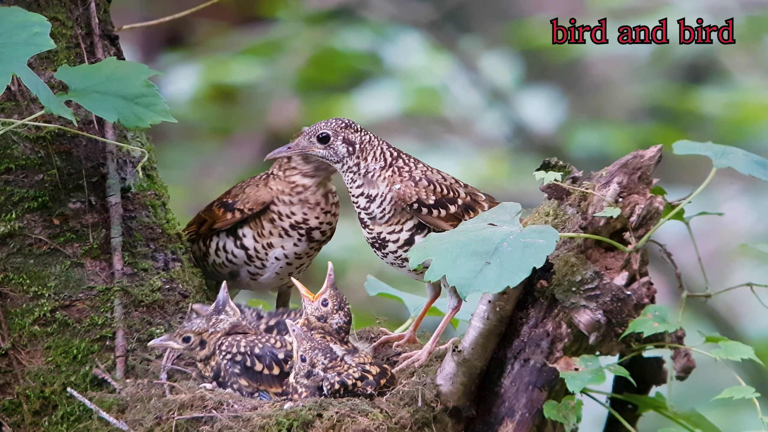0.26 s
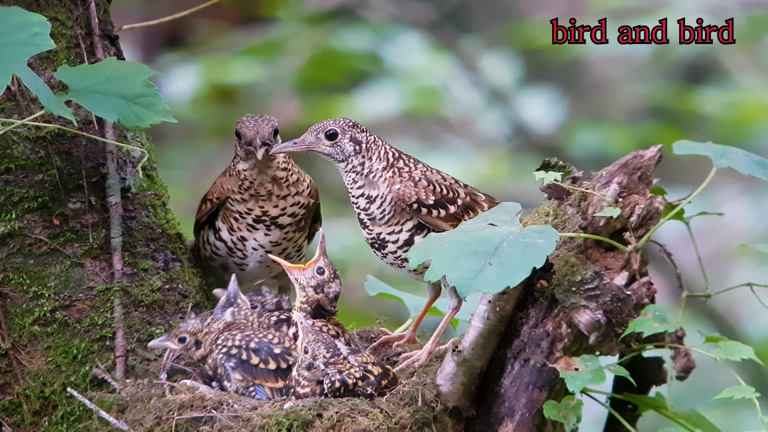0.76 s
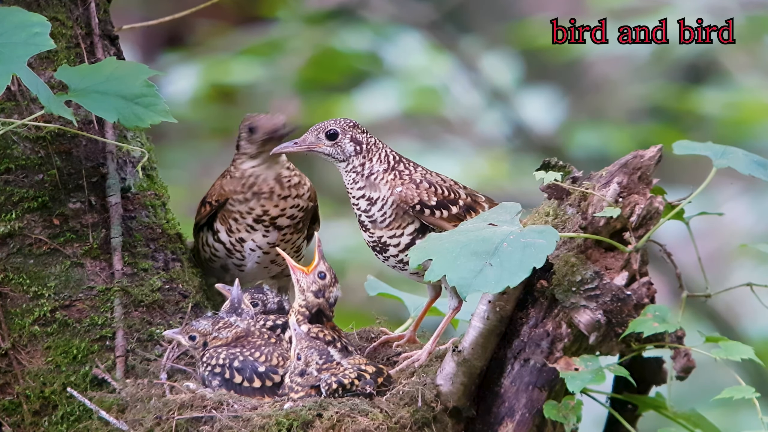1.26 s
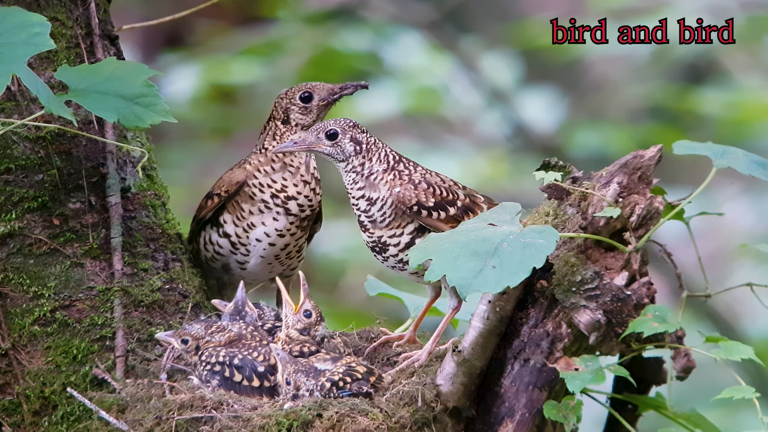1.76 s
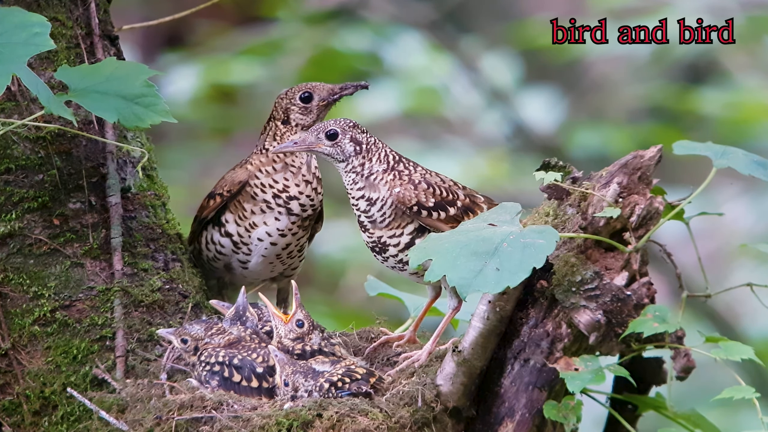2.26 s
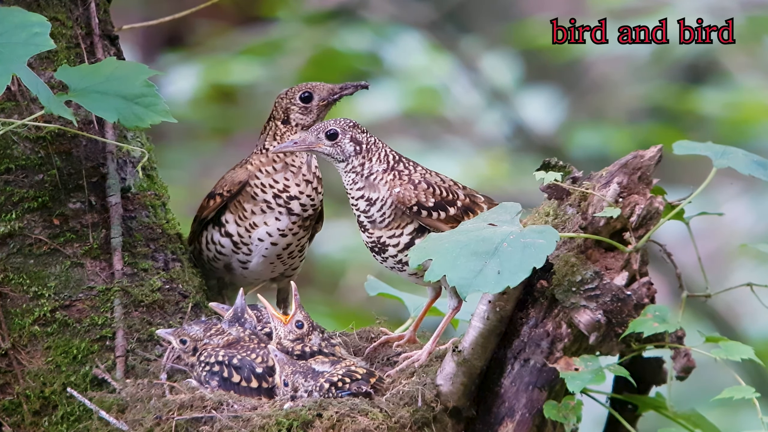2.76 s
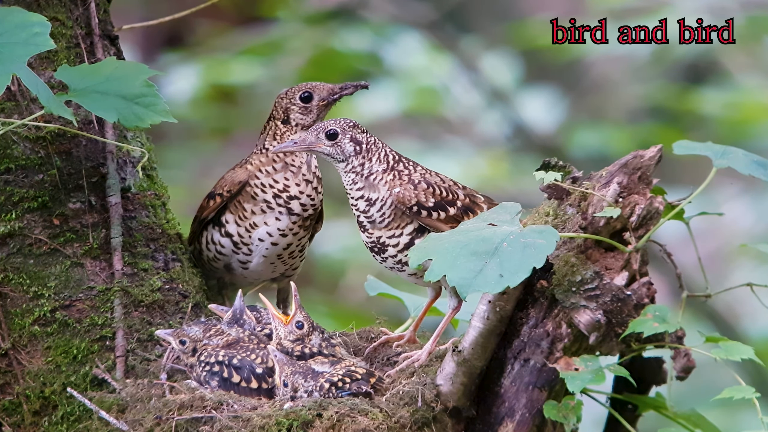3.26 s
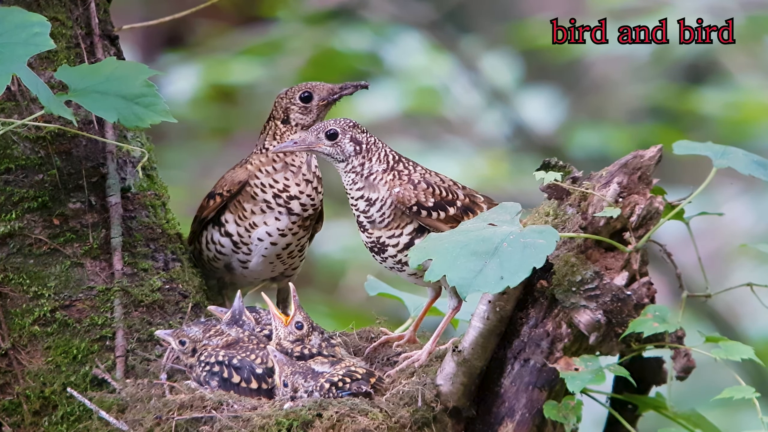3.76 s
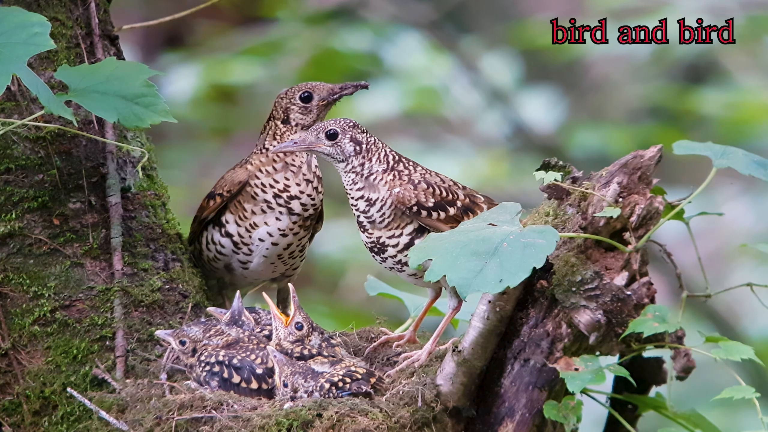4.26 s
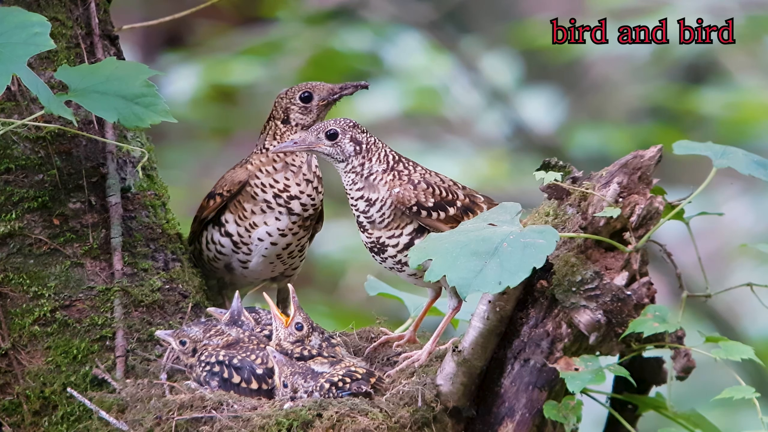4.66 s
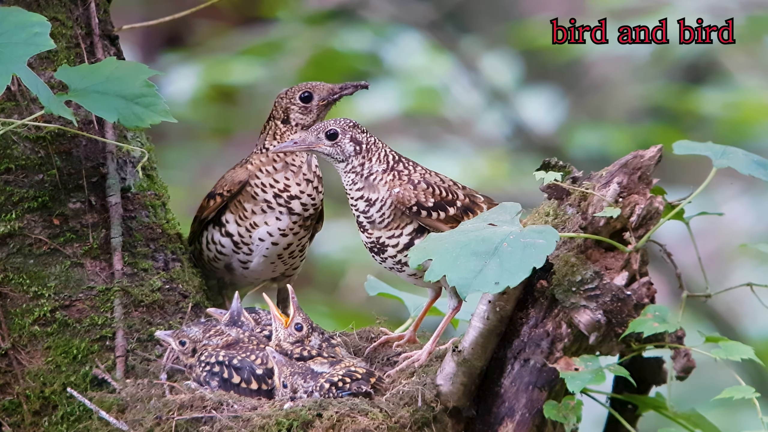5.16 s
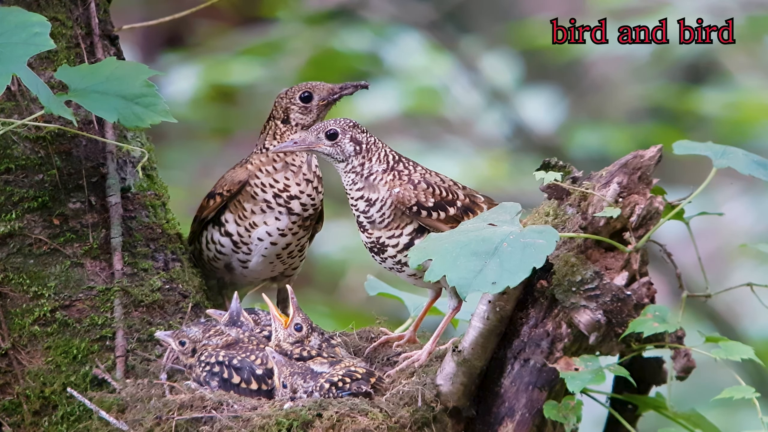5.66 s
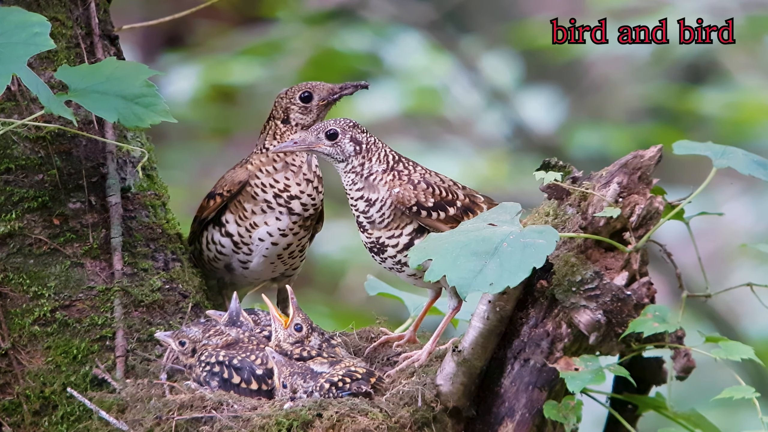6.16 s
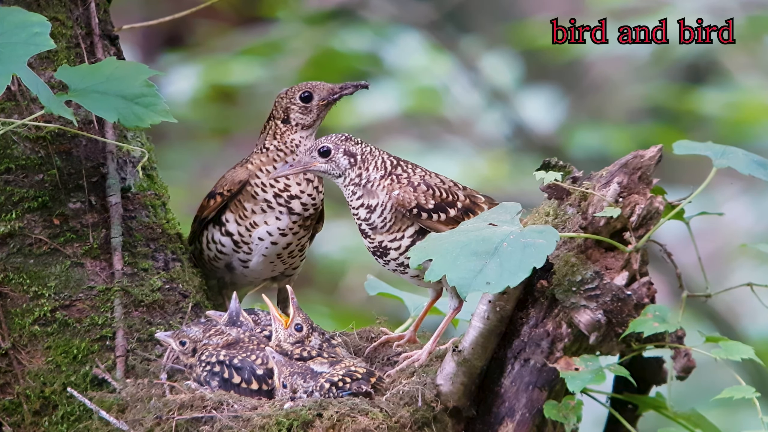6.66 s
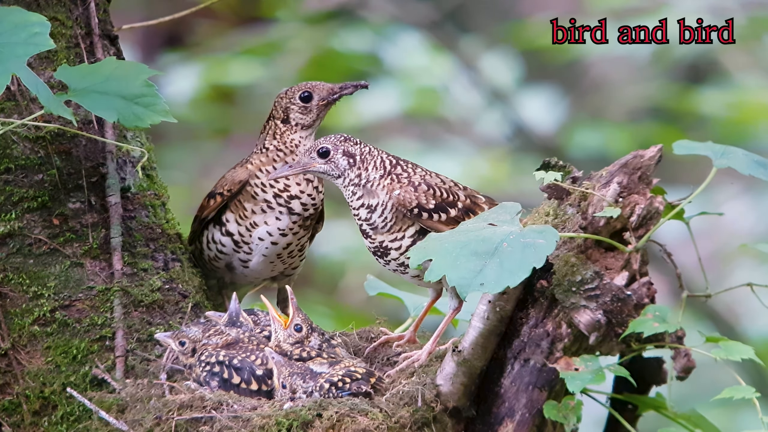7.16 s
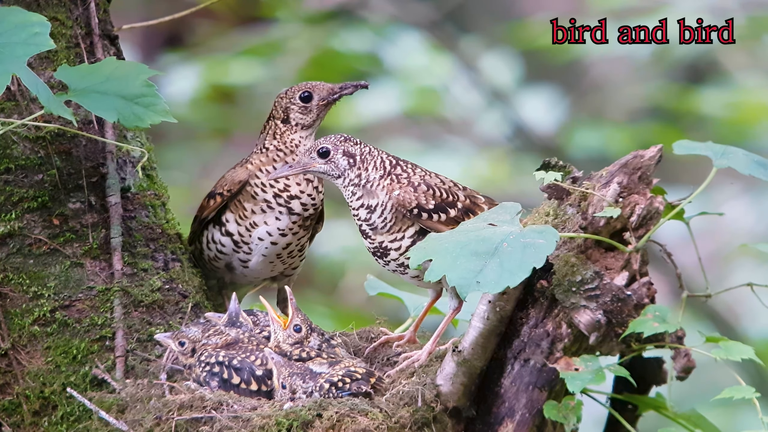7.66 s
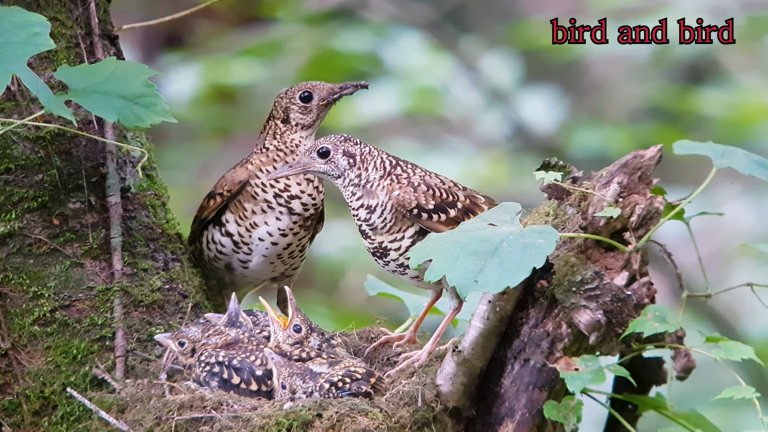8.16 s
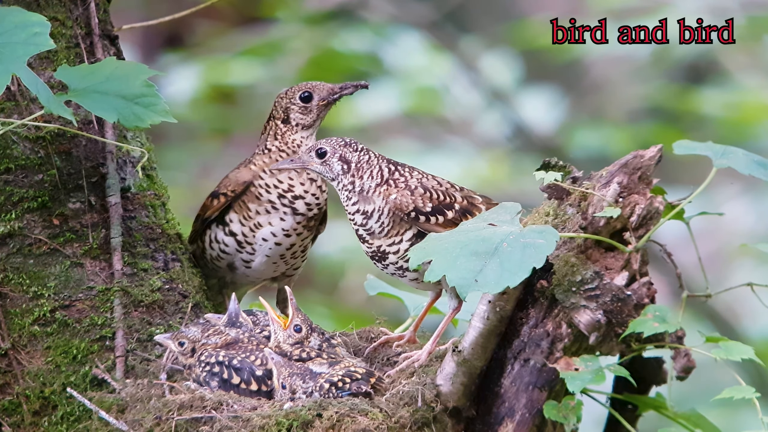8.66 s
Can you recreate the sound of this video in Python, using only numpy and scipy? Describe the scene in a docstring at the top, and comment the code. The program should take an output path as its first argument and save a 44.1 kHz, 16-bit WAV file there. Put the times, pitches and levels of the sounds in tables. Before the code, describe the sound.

Quiet woodland ambience heard from one spot in wide stereo: soft leaf hiss, a blurred insect chorus and a fast, faint cricket pulse to the right. Small birds farther off chatter almost continuously with quick slides and buzzy notes. Cicada noise rises and falls mostly on the right. Twice a clear, level thrush whistle stands out, fluttering slightly, then fading among the trunks.

```python
"""A summer forest from one spot: leaves hiss, a cricket throbs and a far insect chorus hangs throughout.
Songbirds farther off start at once: sines glide into chirrups, upslurs and flutes or blur into buzzes.
From under a second on, a cicada, mostly to the right, swells over its drone: noise pulses ring its body.
A thrush, a pure sine, gives a long, thin whistle at about 1.4 s and another at about 6.4 s.
The trunks return thrush and songbirds as decaying noise echoes; the insects and leaves stay dry."""
import sys
import numpy as np
from scipy import signal
from scipy.io import wavfile
from scipy.ndimage import uniform_filter1d

SR = 44100
rng = np.random.default_rng(int(sys.argv[2]) if len(sys.argv) > 2 else 0)


def unload_wav(signal):
    """Save mono or channel-first audio to the path in sys.argv[1] as 16-bit WAV at rate SR, clipped to [-1, 1]."""
    wavfile.write(
        sys.argv[1],
        SR,
        np.round(np.clip(np.atleast_2d(signal).T, -1, 1) * 32767).astype(np.int16),
    )


N = 392490

DRONE_LIFT_DB = -7.5  # lift of the cicada's upper mode while it only drones


def gain_of(db):
    """Decibels to an amplitude factor."""
    return 10 ** (np.asarray(db) / 20)


def evened(x):
    """Scales to unit rms."""
    return x / np.sqrt(np.mean(x ** 2) + 1e-20)


def curves(rows, t):
    """Every column after the first, read at the times t along straight lines."""
    s, *columns = np.transpose(rows)
    return [np.interp(t, s, column) for column in columns]


def sides(pan_db):
    """Left and right gains, pan_db apart (left minus right), that keep the mean power."""
    left_power = 1 / (1 + gain_of(-np.asarray(pan_db)) ** 2)
    return np.sqrt(2 * np.array([left_power, 1 - left_power])).reshape(2, -1)


def add(mix, s, sound):
    """Mixes a sound in from second s."""
    part = mix[:, round(s * SR):][:, :sound.shape[1]]
    part += sound[:, :part.shape[1]]


def resonate(x, hz, width):
    """A steep moving resonance: shifts the curve hz to zero, smooths twice, and shifts back."""
    turn = np.exp(2j * np.pi * np.cumsum(hz * np.ones(N)) / SR)
    r = np.exp(-np.pi * width / SR)  # width in Hz of each smoothing pass
    smooth = signal.lfilter([(1 - r) ** 2], [1, -2 * r, r * r], x / turn)
    return 2 * (turn * smooth).real


def wander(hz):
    """Random drift of unit rms: noise with what is faster than hz smoothed away."""
    return evened(signal.lfilter(*signal.butter(2, hz, fs=SR), rng.standard_normal(N)))


def echoes(x, t60, gap, sway, sway_hz):
    """Scatter from trunks, a decaying noise for each ear; swaying leaves make it flicker and blur."""
    t = np.arange(2 * SR) / SR
    # silent for gap seconds; falls 60 dB in t60 seconds
    tail = rng.standard_normal((2, len(t))) * gain_of(-60 * t / t60) * (t > gap)
    tail = tail / np.linalg.norm(tail[0])
    flicker = np.array([np.sqrt(1 - sway ** 2) + sway * wander(sway_hz) for ear in range(2)])
    return flicker * signal.fftconvolve(x, tail, axes=1)[:, :N]


def thrush():
    """A pure sine that holds its pitch; each ear's level dips as near reflections beat with it."""
    # The two whistles, one table each. Each row: time in seconds, pitch in Hz, level in dB before the dips,
    # left minus right in dB.
    whistles = [
        [(1.43, 2380, -71, -2), (1.5, 2330, -61, -1), (1.535, 2307, -60, -1), (1.61, 2334, -42, 4),
         (1.68, 2343, -37.5, 8), (1.72, 2352, -42, -7.5), (1.78, 2355, -33.5, 4.5), (1.84, 2348, -34.5, -1),
         (1.89, 2334, -36.5, 8), (2.075, 2348, -42.5, 7), (2.105, 2320, -60, 8)],
        [(6.44, 2470, -75, -2), (6.501, 2392, -51, 1), (6.55, 2376, -48.5, -2.5), (6.69, 2376, -41, -1),
         (6.735, 2400, -35.5, 1.5), (6.9, 2403, -37, -1.5), (6.96, 2413, -40.5, 6.5), (7.04, 2403, -42, 0),
         (7.07, 2388, -51, -3), (7.09, 2440, -73, 0)],
    ]
    # Brief dips of level. Each row: middle in seconds, half-width in seconds,
    # depth in the left ear and in the right ear in dB, before a short smoothing.
    dips = [(1.645, .014, -3.5, -9), (1.697, 0.0081, -15, -4), (1.803, .012, -3.5, -2),
            (1.864, 0.01, -19, -6), (1.933, 0.013, -9, -10), (1.99, 0.014, -1.5, -13),
            (2.045, 0.0069, -2.5, -2), (6.716, .008, -7, -4), (6.755, .007, -6, -1),
            (6.797, .009, -4.5, -1.5), (6.828, .008, -2.5, 0), (6.868, 0.0087, -3, -1.5),
            (7.006, .012, -2.5, -4.5)]
    # How strongly the trunks return the first and the second whistle, in dB.
    trunk_echo_db = (-16.5, -22)
    out, sent = np.zeros((2, 2, N))
    for rows, echo_db in zip(whistles, trunk_echo_db):
        t = np.arange(rows[0][0], rows[-1][0], 1 / SR)
        hz, db, pan_db = curves(rows, t)
        for s, half_width, *dip_db in dips:
            dip_shape = np.exp(-.5 * ((t - s) / half_width) ** 2)
            db = db + np.outer(np.minimum(dip_db, 0), dip_shape)
        level = uniform_filter1d(gain_of(db) * sides(pan_db), 300)
        tone = level * np.sqrt(2) * np.sin(2 * np.pi * np.cumsum(hz) / SR)
        add(out, t[0], tone)
        add(sent, t[0], gain_of(echo_db) * tone)
    return out + echoes(sent, t60=2.3, gap=.03, sway=.3, sway_hz=12)


def songbirds():
    """Gliding sines with a quick start; buzz trades the clean tone for a rasp around it."""
    buzz_hz, fade_hz = 430, 40  # half-width of the rasp; speed of the fading through leaves
    out = np.zeros((2, N))
    rasp, fading = (np.array([wander(hz) + 1j * wander(hz) for ear in range(2)])
                    for hz in (buzz_hz, fade_hz))
    for s, length, *hz, buzz, level_db, pan_db in notes():
        u = np.linspace(0, 1, round(length * SR))  # place within the note
        glide = np.interp(u, [0, .5, 1], hz)
        glide = uniform_filter1d(glide, len(u) // 4 + 1, mode="nearest")
        at = np.arange(len(u)) + min(round(s * SR), N - len(u))
        clean = (1 - .6 * np.clip(buzz, 0, 1)) * (1 + .5 * fading[:, at])
        voice = clean + (.1 + .7 * buzz) * rasp[:, at]
        shape = np.sin(np.pi * u ** .75) ** .6  # swells fast, fades slower
        tone = (voice * np.exp(2j * np.pi * np.cumsum(glide) / SR)).real
        add(out, s, sides(pan_db) * gain_of(level_db) * evened(tone * shape))
    near = echoes(out, t60=.35, gap=.004, sway=.85, sway_hz=45)
    far = echoes(out, t60=1.3, gap=.05, sway=.8, sway_hz=70)
    return gain_of(-2.5) * out + gain_of(-7) * near + gain_of(-10.5) * far


def notes():
    """Songbird notes: start s, length s, start, middle, end Hz, buzz 0-1, level dB, left minus right dB."""
    # Low-high-low chirrups. Each row: start of the high note in seconds, high and low pitch in Hz,
    # level in dB of the high note, of the low note before and of the low note after, ahead of the mix.
    chirrups = [(3.404, 2947, 2316, -49, -60.5, -57), (3.555, 2930, 2343, -51, -60.5, -58.5),
                (3.823, 2836, 2270, -51, -66, -57), (3.979, 2930, 2350, -51, -59, -57),
                (7.746, 3006, 2385, -49, -60, -57), (7.895, 2980, 2450, -49, -56, -54.5),
                (8.152, 2845, 2300, -49, -61, -53.5), (8.313, 2960, 2322, -53.5, -64, -68)]
    # Upslurs. Each row: start in seconds, length in seconds, start and end pitch in Hz,
    # level in dB ahead of the mix, left minus right in dB.
    upslurs = [(0.531, .021, 4040, 4680, -56.5, -14), (4.767, .09, 3810, 4890, -53, 1.5),
               (5.075, 0.065, 4450, 4880, -58.5, 5), (5.676, 0.092, 4450, 5200, -60.5, 9),
               (6.0, .075, 4900, 5830, -62.5, 0), (6.408, .055, 4550, 5230, -63, 8),
               (6.747, .07, 4800, 5570, -64, 6), (7.057, 0.1, 4420, 5840, -62, 5),
               (7.672, 0.035, 4200, 4400, -67, 2)]
    # Buzzy notes. Each row: start in seconds, length in seconds, middle pitch in Hz, drift from start
    # to end in Hz, level in dB ahead of the mix, left minus right in dB.
    buzzy_notes = [(0.186, 0.137, 2380, -90, -61.5, -4), (0.197, .12, 2860, 157, -58, -7),
                   (0.92, 0.21, 3445, -120, -64, -2), (1.236, 0.22, 3635, 239, -62.5, -5),
                   (2.329, .14, 3510, 54, -64, -4), (2.444, 0.18, 2578, -56.5, -62, -3),
                   (3.304, 0.097, 3400, -51, -65.5, -11), (3.65, 0.19, 3450, -200, -62.5, -3),
                   (3.906, 0.27, 3470, -230, -56.5, -1.5), (5.954, 0.091, 3425, -6, -54, 0),
                   (6.008, 0.22, 3364, -71, -55, 2), (6.26, 0.07, 3490, 72, -57.5, -7),
                   (6.544, 0.3, 3334, -110, -64, -8), (7.369, 0.11, 2296, -220, -60, -8),
                   (7.479, 0.097, 2260, 101, -58, -5.5), (7.55, 0.11, 3560, 117, -65.5, -1),
                   (7.907, 0.049, 3476, -51, -52.5, -4), (7.948, 0.14, 3445, 193, -52, -1)]
    # Fluted notes. Each row: start in seconds, length in seconds, start, middle and end pitch in Hz,
    # level in dB ahead of the mix, left minus right in dB.
    fluted_notes = [(1.879, .16, 3470, 3400, 3410, -55, 0), (2.197, 0.096, 2800, 2850, 3260, -55, -2),
                    (2.629, 0.19, 2600, 2650, 2420, -61.5, -14),
                    (2.965, 0.093, 3480, 3240, 3160, -54.5, -5.5), (3.132, 0.18, 2250, 2344, 2190, -61, -6),
                    (4.441, .23, 3480, 3714, 3670, -62.5, -6), (4.895, 0.031, 2900, 2660, 2570, -60, -6),
                    (4.936, 0.14, 2700, 2693, 2560, -58, -10), (5.12, .13, 2300, 2172, 2163, -59.5, -16),
                    (5.2, 0.083, 2150, 2140, 2140, -62, 2), (5.424, 0.098, 2900, 2795, 2566, -57, -10),
                    (5.506, .094, 2650, 2540, 2537, -53.5, -2), (5.705, .11, 2300, 2282, 2065, -55.5, -7),
                    (5.8, .085, 2150, 2183, 2146, -55, -5), (6.104, 0.062, 2950, 2883, 2510, -52, -12),
                    (6.161, .13, 2600, 2482, 2466, -55.5, -3), (7.132, 0.086, 3165, 3224, 2840, -54, -4)]

    before_s, after_s = .033, .038  # low notes start this long before and after the high one
    high_s, low_s, scoop_hz = 0.048, .043, 97  # note lengths; pitch scoop into the high note
    high_buzz, low_buzz, high_pan_db, low_pan_db = 0.35, 0.052, 0, -4.5
    for s, high, low, high_db, before_db, after_db in chirrups:
        yield s - before_s, low_s, low - scoop_hz / 2, low, low, low_buzz, before_db, low_pan_db
        yield s, high_s, high - scoop_hz, high, high, high_buzz, high_db, high_pan_db
        yield s + after_s, low_s, low + scoop_hz / 2, low, low, low_buzz, after_db, low_pan_db

    slur_bend, slur_buzz = .72, .22  # share of the climb done at half length; rasp
    for s, length, low, high, db, pan_db in upslurs:
        yield s, length, low, low + slur_bend * (high - low), high, slur_buzz, db, pan_db
    for s, length, hz, drift, db, pan_db in buzzy_notes:
        yield s, length, hz - drift / 2, hz, hz + drift / 2, 0.74, db, pan_db
    for s, length, *hz, db, pan_db in fluted_notes:
        yield s, length, *hz, 0.37, db, pan_db


def cicada():
    """Uneven tymbal buckles, blurred by distance, ring the modes of the hollow body."""
    # Modes of the body. Each row: centre in Hz before tuning, width in Hz of each smoothing pass,
    # level in dB before effort and lift, left minus right in dB.
    body_modes = [(5610, 570, -6.5, 0.5), (8710, 700, -1.5, -14.5), (9710, 2630, -3, -15.5),
                  (10925, 580, -1.5, -3), (11485, 450, 1, -8.5), (12400, 1300, -9, -7),
                  (13930, 940, -11, -13)]
    effort_db, lift_db = effort()
    tuning = 1 + .001 * (effort_db + 58) + .006 * wander(4)  # the body tightens with effort
    buckles = np.cumsum(210 * (1 + 0.32 * wander(40))) / SR  # about 210 a second
    pulses = (1.8 + np.exp(-(buckles % 1) / .3)) * gain_of(0.82 * wander(8.3))
    out = np.zeros((2, N))
    for hz, width, db, pan_db in body_modes:
        if width > 1000:  # the broad rustle between the modes grows less with effort
            db = db - 0.29 * (effort_db + 64.5) + 0.33 * (lift_db - DRONE_LIFT_DB)
        elif 11400 < hz < 13000:  # the upper mode
            db = db + lift_db
        ring = evened(resonate(pulses * rng.standard_normal((2, N)), hz * tuning, width))
        out += sides(pan_db) * gain_of(effort_db + db) * ring
    return out


def effort():
    """The cicada's effort and the lift of its upper mode: drone, swells and rasps add as powers."""
    # Drone between the swells. Each row: time in seconds, effort in dB.
    drone = [(0, -68.5), (1.9, -66), (2.65, -68.5), (3.15, -65), (4.0, -65), (4.08, -99), (4.36, -89),
             (4.7, -68.5), (5.28, -72.5), (5.85, -59), (6.05, -67.5), (6.9, -86), (7.25, -67), (7.95, -60),
             (8.4, -84), (8.6, -71.5), (8.9, -73)]
    # Swells. Each row: start, peak and end in seconds, effort at the peak in dB,
    # lift of the upper mode halfway between start and end in dB.
    swells = [(0.745, .98, 1.05, -63.5, 3), (1.21, 1.58, 1.71, -59, -8), (3.313, 3.665, 3.79, -56.5, -1),
              (5.397, 5.677, 5.79, -56, -4.5), (7.362, 7.57, 7.73, -54.5, -5)]
    # Short rasps after a swell. Each row: middle in seconds, effort at the middle in dB.
    short_rasps = [(1.805, -60), (3.89, -63), (3.96, -74), (5.875, -62), (5.94, -65), (6.44, -68),
                   (7.825, -57.5)]
    rise_s, rise_db, fall_s, fall_db = 0.14, -5.5, 0.12, -4  # slopes outside a swell; dB re its peak
    lift_climb_db = 2  # the upper mode gains this much through a swell
    rasp_s, rasp_lift_db = 0.033, 0  # half-length of a rasp; its lift

    t = np.arange(0, N + 64, 64) / SR
    parts = [(curves(drone, t)[0], DRONE_LIFT_DB)]
    for start, peak, end, db, lift_db in swells:
        times = [start - rise_s, start, peak, end, end + fall_s]
        shape_db = np.interp(t, times, [-25, rise_db, 0, fall_db, -25])
        climb_db = lift_climb_db * np.interp(t, [start, end], [-.5, .5])
        parts.append((db + shape_db, lift_db + climb_db))
    for s, db in short_rasps:
        parts.append((db - 25 * np.minimum(abs(t - s) / rasp_s, 1) ** 2, rasp_lift_db))

    power = sum(gain_of(2 * db) for db, lift_db in parts)
    mean_lift_db = sum(gain_of(2 * db) * lift_db for db, lift_db in parts) / power
    return [np.interp(np.arange(N) / SR, t, c) for c in (10 * np.log10(power), mean_lift_db)]


def cricket():
    """Wing strokes throb about 11.5 times a second in two narrow bands, far to the right."""
    # Each row: time in seconds, level in dB before the throb, throb up and down from it in dB.
    cricket_song = [(0, -66.5, 5.5), (2.1, -70, 6), (4.2, -76, 5.5), (5.2, -73.5, 3), (8.9, -72, 5)]
    level_db, throb_db = curves(cricket_song, np.arange(N) / SR)
    strokes = np.cumsum(11.5 * (1 + .03 * wander(1.5))) / SR
    throb = gain_of(throb_db * np.cos(2 * np.pi * strokes))
    rasp = rng.standard_normal((2, N))
    wings = evened(resonate(rasp, 8750, 640)) + gain_of(-7.5) * evened(resonate(rasp, 11170, 900))
    return sides(-22) * gain_of(level_db) * throb * wings


def chorus():
    """Many far insects melt into one broad fuzzy band of noise."""
    # Each row: time in seconds, level in dB and centre in Hz, both before a small random drift.
    far_insects = [(0, -71, 5100), (.82, -65, 5330), (1.31, -70.5, 4930), (1.73, -67, 4820),
                   (3.54, -66.5, 5000), (4.19, -73.5, 4870), (5.08, -64, 4740), (6.15, -64, 5550),
                   (6.45, -66.5, 5200), (6.85, -64.5, 5120), (8.45, -74, 4900), (8.9, -67, 5140)]
    level_db, hz = curves(far_insects, np.arange(N) / SR)
    band = evened(resonate(rng.standard_normal((2, N)), hz * (1 + .015 * wander(3)), 1000))
    return sides(0.62) * gain_of(level_db + 1.6 * wander(16)) * band


def leaves():
    """Hiss of the leaves: random short-time spectra with faint drifting patches."""
    # Colour of the hiss. Each row: frequency in Hz, relative level in dB per Hz.
    hiss_colour = [(30, -12), (60, 8), (100, -2.5), (700, -12.5), (1280, -3), (2800, 0), (3490, 1.5),
                   (4050, -6.5), (5170, 1), (6440, -11.5), (7830, -13), (11000, -20.5), (14400, -27.5),
                   (15600, -15.5)]
    # Likeness of the two ears. Each row: frequency in Hz, left-right likeness from 0 to 1.
    ear_likeness = [(30, 0.13), (250, 0.2), (700, 0.39), (1500, 0.62), (3000, 0.22), (8000, 0.042)]
    frames, hz = N // 256 + 5, np.fft.rfftfreq(1024, 1 / SR)
    a, b, c, d, patches = rng.standard_normal((frames, 513, 5)).T
    patches = uniform_filter1d(patches, 8, 0)  # across frequency
    patches = evened(uniform_filter1d(patches, 14, 1))  # across time
    patches_db = 1.8 * patches * np.clip(hz / 2000, .2, 1)[:, None]  # the bass stays even

    def over_log_hz(rows):
        """Reads a frequency table along a logarithmic scale."""
        return curves([(np.log(f), v) for f, v in rows], np.log(hz + 1))[0][:, None]

    colour_db = over_log_hz(hiss_colour)
    same = np.clip(over_log_hz(ear_likeness), 0, 1)
    left = a + 1j * b
    right = same * left + np.sqrt(1 - same ** 2) * (c + 1j * d)
    spectra = np.array([left, right]) * gain_of(colour_db + patches_db)
    hiss = signal.istft(spectra, nperseg=1024, noverlap=768)[1][:, :N]
    return sides(0.82) * gain_of(-62) * evened(hiss)


def scene():
    """All voices of the forest."""
    return thrush() + songbirds() + cicada() + cricket() + chorus() + leaves()


def record(dry):
    """The microphone drops the deepest bass; then the band limit of the recorder."""
    edge_hz = 15690
    thinned = signal.sosfilt(signal.butter(5, 42, "high", fs=SR, output="sos"), dry)
    band_limit = signal.firwin(1023, edge_hz, window=("kaiser", 9), fs=SR)
    return signal.oaconvolve(thinned, band_limit[None], "same")


dry = scene()
out = record(dry)
unload_wav(out)
```